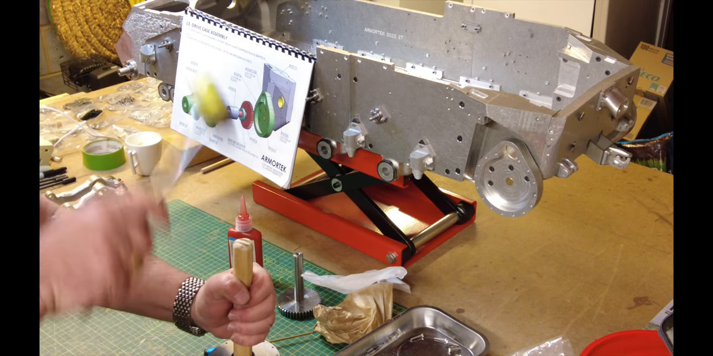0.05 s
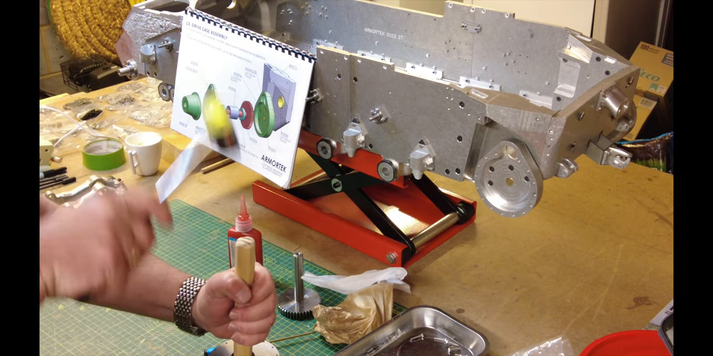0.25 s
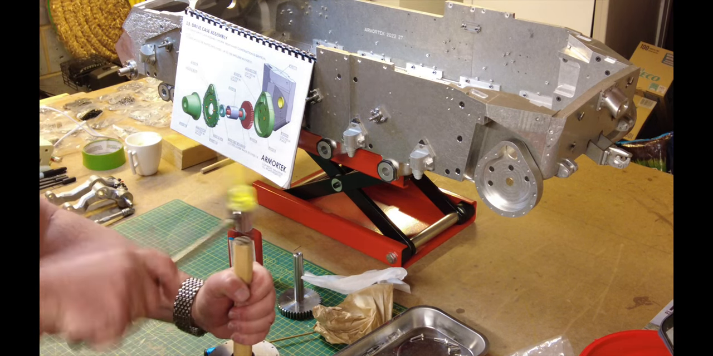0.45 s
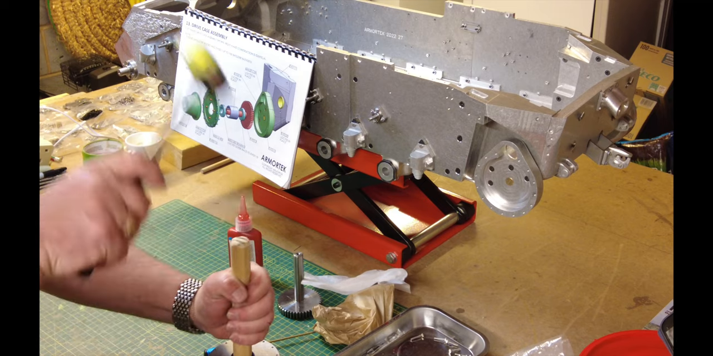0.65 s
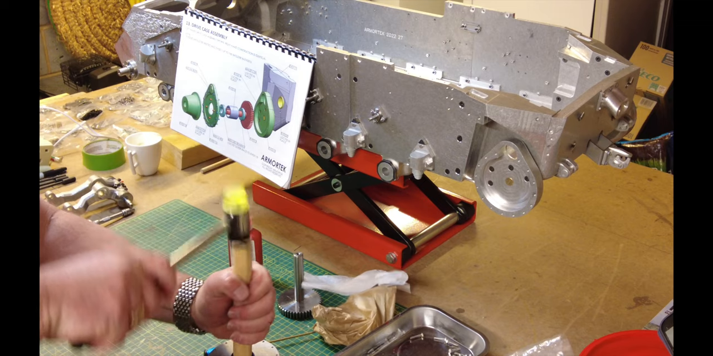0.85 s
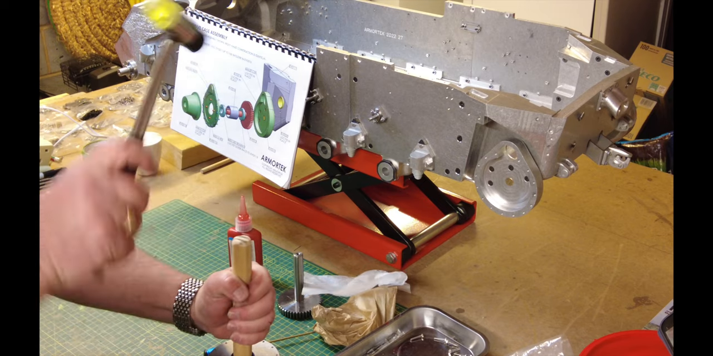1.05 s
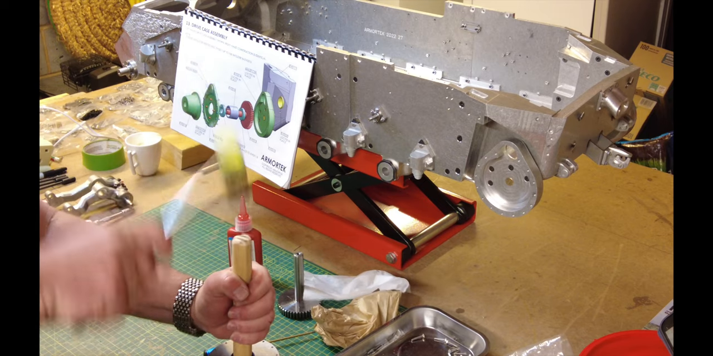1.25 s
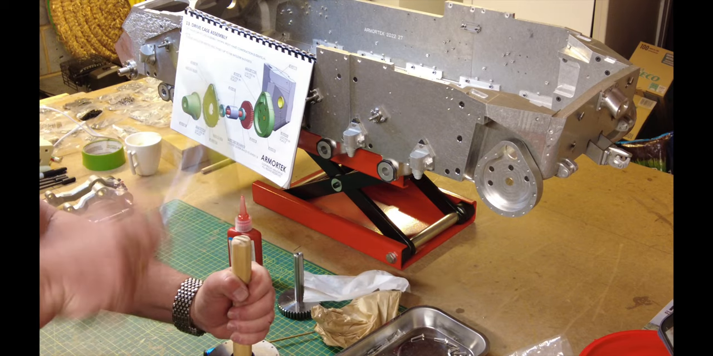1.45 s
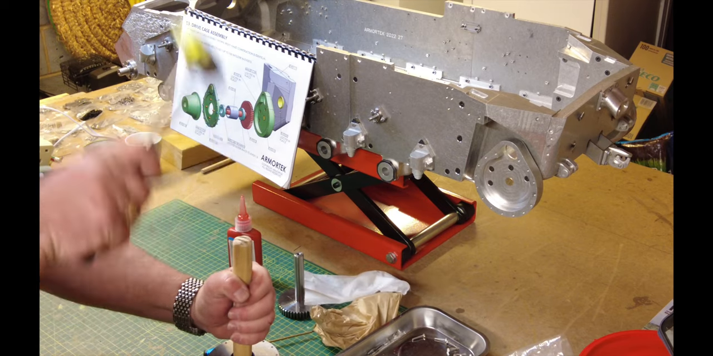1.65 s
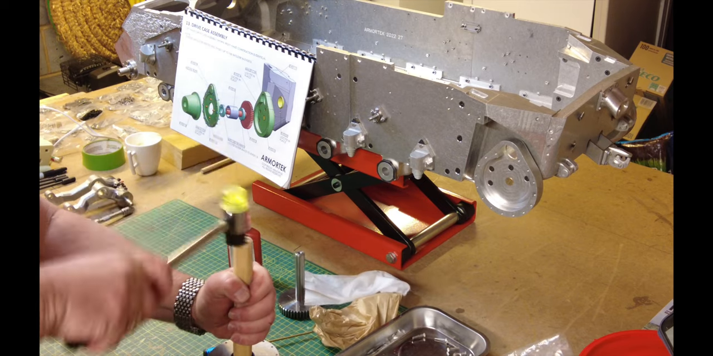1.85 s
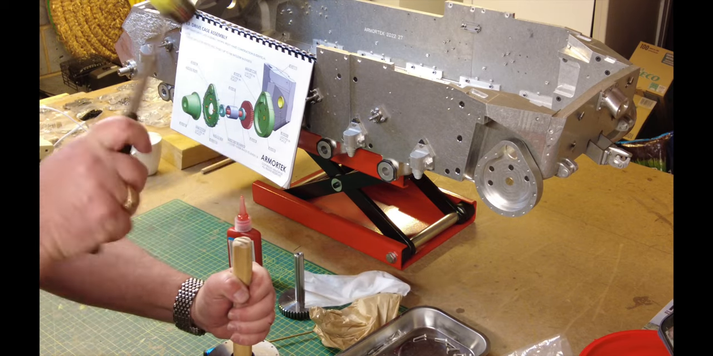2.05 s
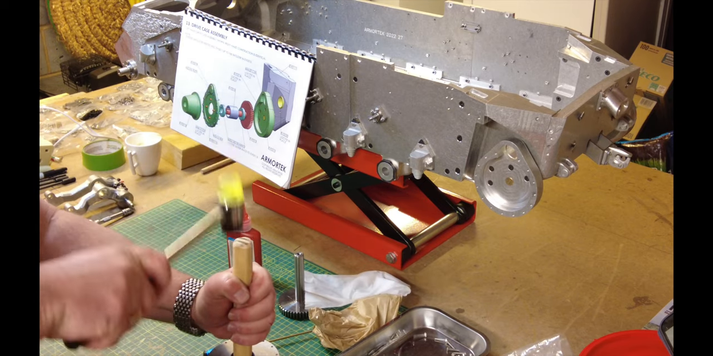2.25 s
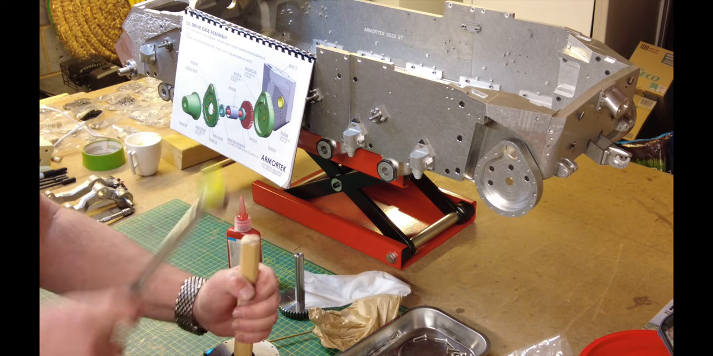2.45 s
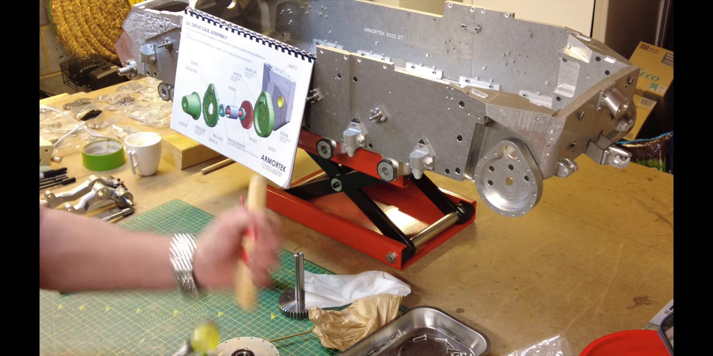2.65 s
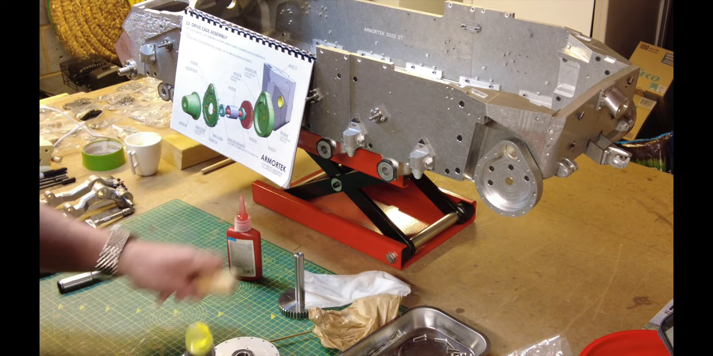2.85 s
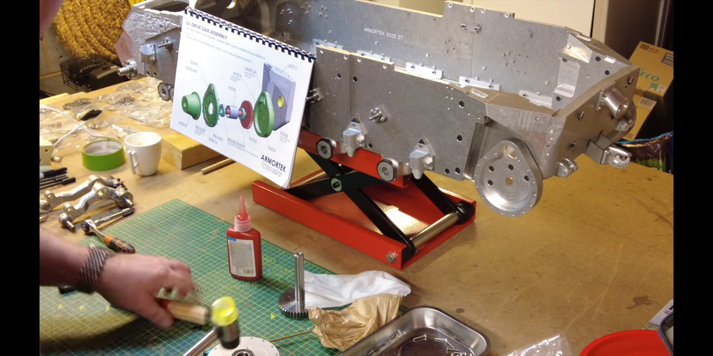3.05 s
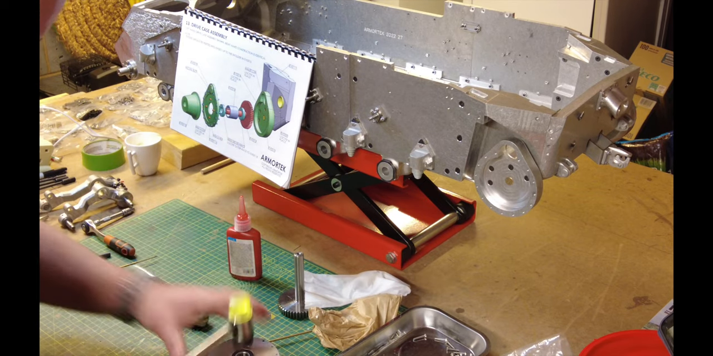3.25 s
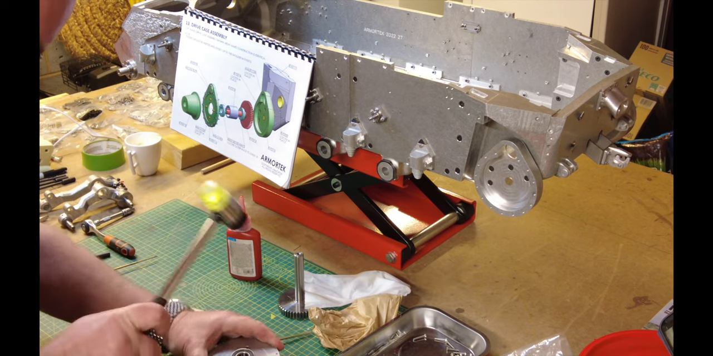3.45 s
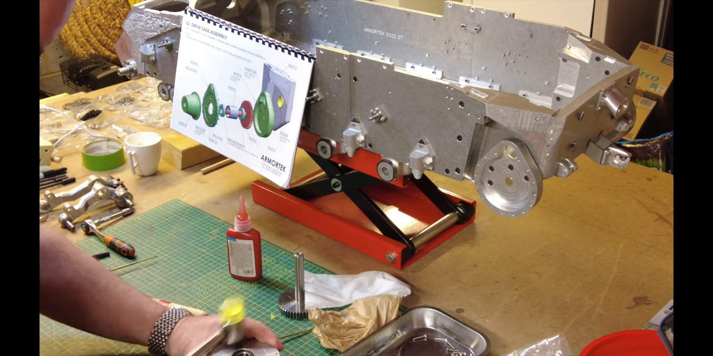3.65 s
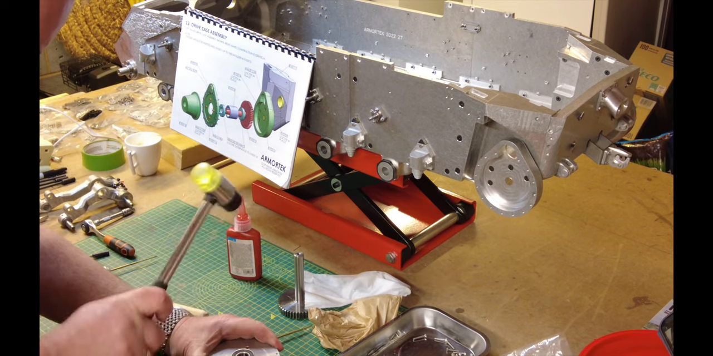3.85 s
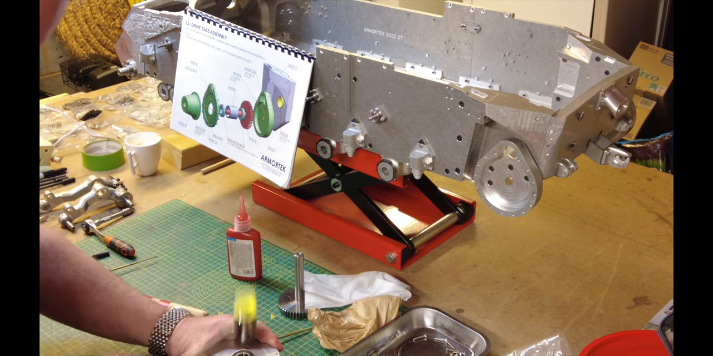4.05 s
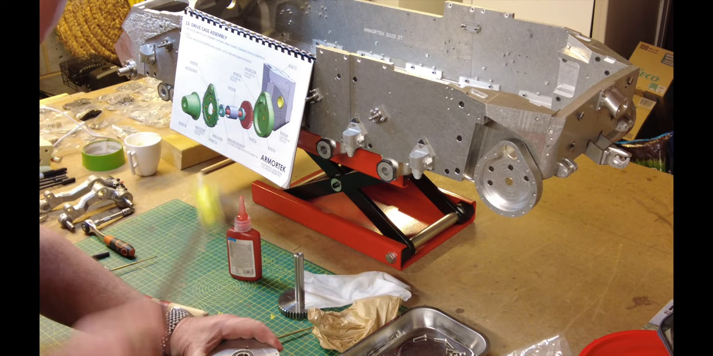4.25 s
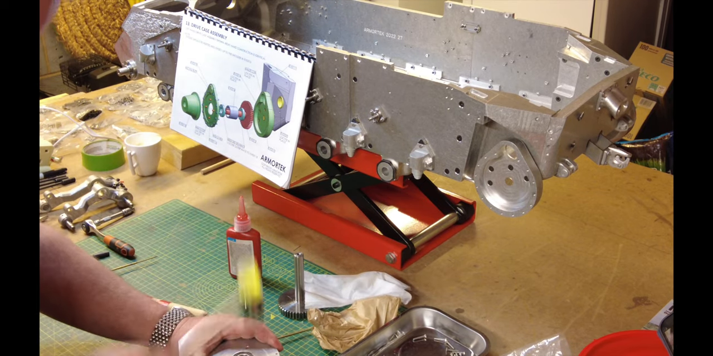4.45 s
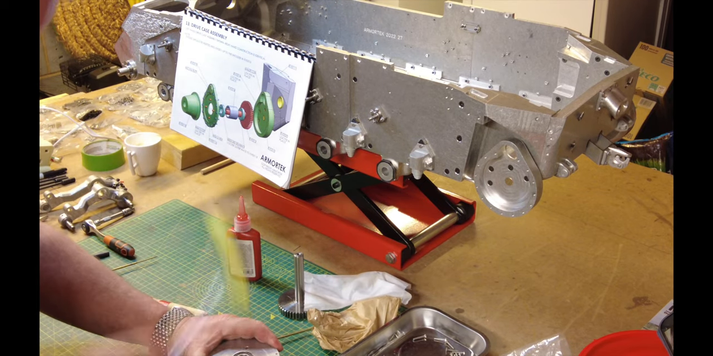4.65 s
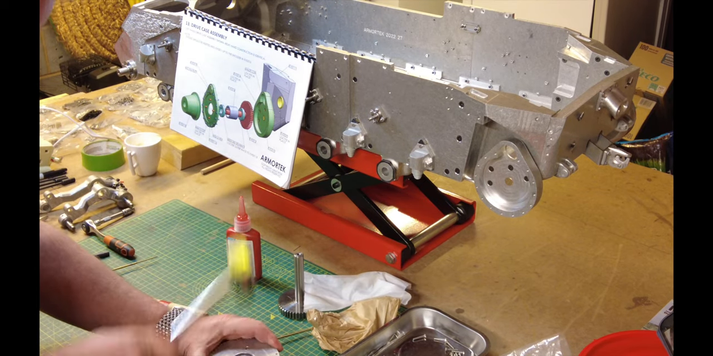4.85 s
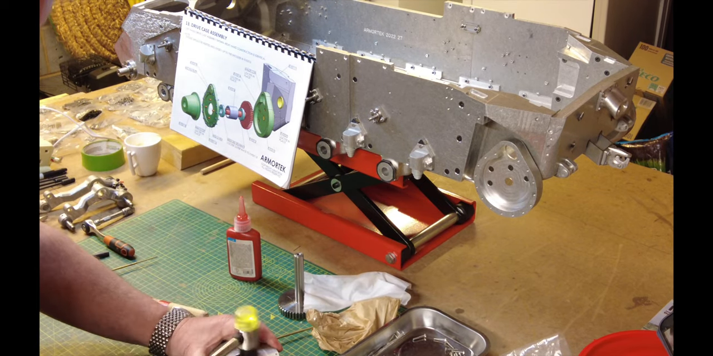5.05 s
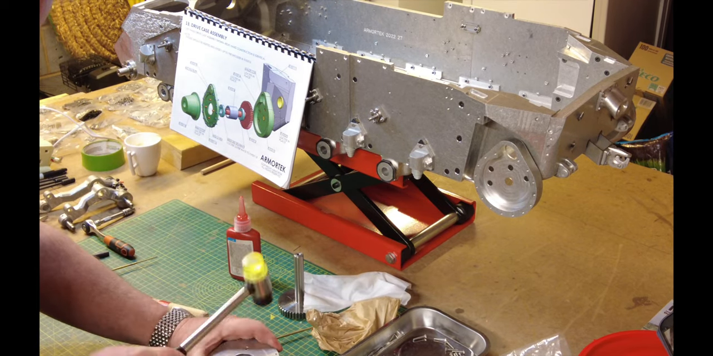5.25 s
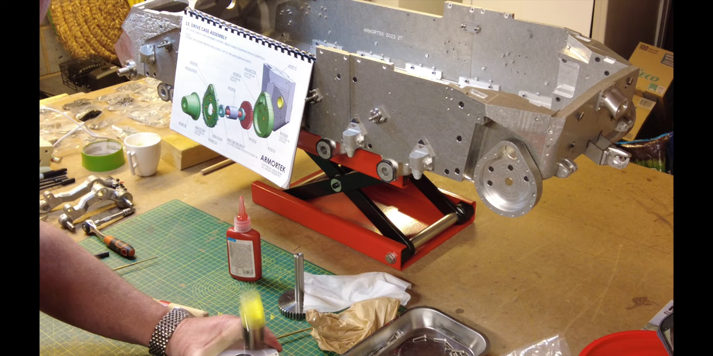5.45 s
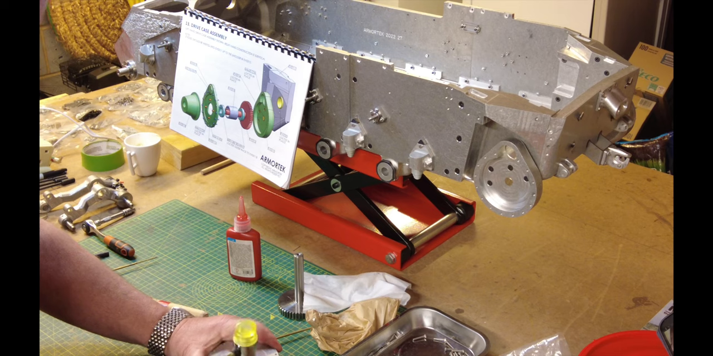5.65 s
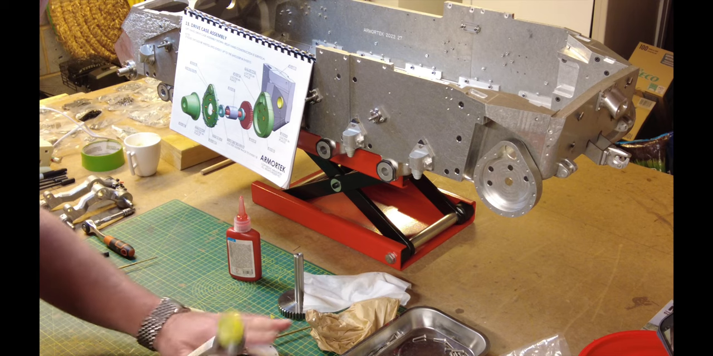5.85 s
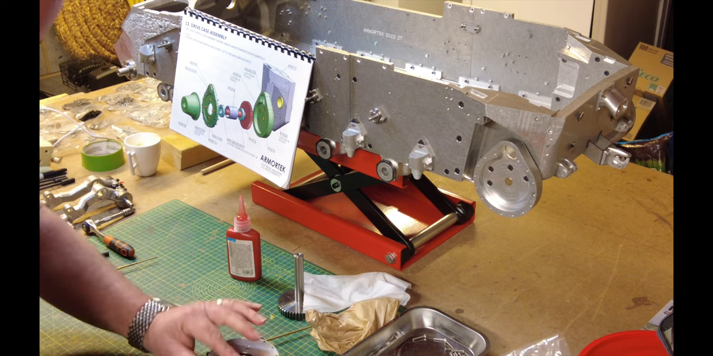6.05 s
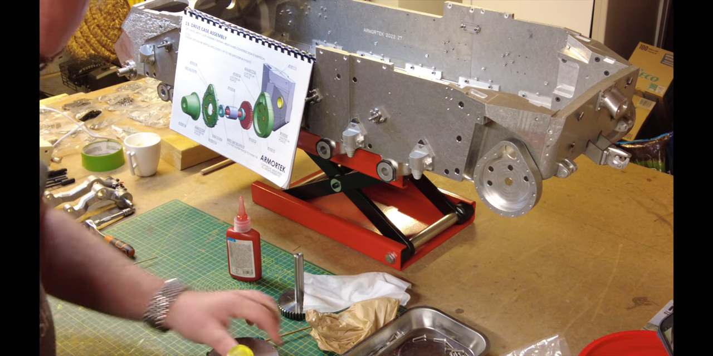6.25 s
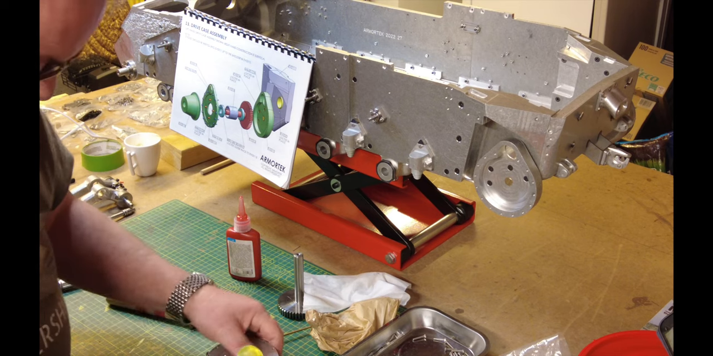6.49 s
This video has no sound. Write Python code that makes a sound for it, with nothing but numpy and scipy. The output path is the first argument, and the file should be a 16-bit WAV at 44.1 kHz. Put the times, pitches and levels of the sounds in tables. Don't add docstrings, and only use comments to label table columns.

```python
import sys
import numpy as np
from scipy import signal
from scipy.fft import rfft, irfft, next_fast_len
from scipy.io import wavfile
from scipy.ndimage import map_coordinates

SR = 44100
rng = np.random.default_rng(int(sys.argv[2]) if len(sys.argv) > 2 else 0)


def dump(signal):
    limited = np.clip(np.atleast_2d(signal).T, -1, 1)
    pcm = np.round(limited * 32767).astype(np.int16)
    wavfile.write(sys.argv[1], SR, pcm)


def magnitude_from_level(level_db):
    exponent = np.asarray(level_db, float) / 20
    return 10 ** exponent


N = 287531


def unit(x):
    return x / np.sqrt(np.mean(x ** 2) + 1e-20)


def along(points, hz):
    f, v = np.transpose(points)
    return np.interp(np.log(hz + 1), np.log(f + 1), v)


def filtered(x, response):
    m = next_fast_len(len(x) + 8192)
    return irfft(rfft(x, m) * response(np.fft.rfftfreq(m, 1 / SR)), m)[:len(x)]


def shaped(x, spectrum):
    return filtered(x, lambda hz: magnitude_from_level(along(spectrum, hz)))


def resonances(peaks):
    def response(f):
        total = 0
        for k, (centre, width, db) in enumerate(peaks):
            damping = 1j * f * width
            total = total + (-1) ** k * magnitude_from_level(db) * damping / (centre ** 2 - f ** 2 + damping)
        return total
    return response


def noise(n, spectrum):
    return unit(shaped(rng.standard_normal(n), spectrum))


def wobble(rate_hz):
    knots = rng.standard_normal(int(N * rate_hz / SR) + 4)
    return map_coordinates(knots, [np.arange(N) * rate_hz / SR])


def add(out, s, x):
    i = round(s * SR)
    out[i:i + len(x)] += x[:len(out) - i]


def held(strokes):
    t = np.arange(N) / SR
    gain = np.zeros(N)
    for start, end, db, rise, fall in strokes:
        outside = np.maximum((start - t) / rise, (t - end) / fall)
        gain += magnitude_from_level(db - 20 * np.maximum(0, outside))
    return gain


# f/Hz, t60/s
ROOM_DECAY = [(60, 0.16), (160, 0.32), (420, 0.27), (1100, 0.27), (2900, 0.33), (6000, 0.3), (9500, 0.28),
              (12500, 0.23), (16000, .1)]


def dying(x, stretch=1):
    hz, t, z = signal.stft(x, SR, nperseg=256)
    t60 = stretch * along(ROOM_DECAY, hz)[:, None]
    return signal.istft(z * magnitude_from_level(-60 * t / t60), SR, nperseg=256)[1][:len(x)]


# f/Hz, level/dB
HUM = [(12, -39), (20, -8), (60, -2.5), (88, -24.5), (127, -11.5), (182, -23), (399, -29.5), (434, -27.5),
       (472, -30), (1000, -37.5), (2530, -44.5), (3160, -50), (3630, -47), (7110, -53), (16000, -61)]
FAN_HZ, FAN_WIDTH_HZ, FAN_OVER_FLOOR_DB = 1000, 340, 1
FAN_DB, RUMBLE_DB = -66, -60.5
FAN_CLIMB_DB_PER_S, RUMBLE_CLIMB_DB_PER_S = 0.62, 1
STIR_DB, STIR_FLIGHT_POWER, STIR_T60_S = -51, 0.83, 0.99


def workshop():
    t = np.arange(N) / SR
    stir = np.zeros(N)
    for s, _, _, flight, _ in DOWEL + DIRECT + RIM:
        decay = magnitude_from_level(STIR_DB - 60 * np.abs(t - s) / STIR_T60_S) * (t > s)
        stir += decay * (flight * 20) ** STIR_FLIGHT_POWER
    steady = noise(N, HUM)
    below = lambda hz: 1 / (1 + (hz / 250) ** 4)
    low = unit(filtered(steady, below))
    high = unit(filtered(steady, lambda hz: (1 - below(hz)) / (1 + (hz / 13000) ** 12)))
    blades = resonances([(FAN_HZ, FAN_WIDTH_HZ, 0)])
    whirr = unit(filtered(rng.standard_normal(N), lambda hz: blades(hz) ** 2))
    high = high + magnitude_from_level(FAN_OVER_FLOOR_DB) * whirr
    fan = magnitude_from_level(FAN_DB + FAN_CLIMB_DB_PER_S * t) + stir
    rumble = magnitude_from_level(RUMBLE_DB + RUMBLE_CLIMB_DB_PER_S * t) + stir
    return fan * magnitude_from_level(-7 + wobble(17.0)) * high + rumble * magnitude_from_level(1.1 * wobble(36)) * low


DOWEL_JOLT_DB, DIRECT_JOLT_DB, RIM_JOLT_DB = -43.5, -29, -43
JOLT_FLIGHT_POWER = 5.3


def air_push():
    out, t = .0008 * wobble(7.6) - .0012, np.arange(SR) / SR
    jolt = 3 * (1.4 * np.exp(-t / .085) - 3 * np.exp(-t / .03) + 1.6 * np.exp(-t / .006))
    for blows, jolt_db in ((DOWEL, DOWEL_JOLT_DB), (DIRECT, DIRECT_JOLT_DB), (RIM, RIM_JOLT_DB)):
        for s, _, _, flight, _ in blows:
            add(out, s, magnitude_from_level(jolt_db) * (flight * 20) ** JOLT_FLIGHT_POWER * jolt)
    return out


# t/s, peak/dB, f/Hz
CLINKS = [(2.665, -66, 9300), (2.704, -61, 6650), (2.725, -58, 7300), (2.804, -66, 2120),
          (2.850, -66, 7000), (2.874, -63, 7240), (3.231, -58, 2500), (4.176, -48, 8300),
          (4.257, -53, 8140), (5.92, -62, 2400), (6.385, -60, 2150)]
CLINK_T60_S, CLINK_WIDTH_OVER_PITCH, CLINK_EDGE_DB = .03, .12, -4
# start/s, end/s, level/dB, rise/s, fall/s
RUSTLE = [(6.3, 6.42, -71.5, 0.2, .2)]
# f/Hz, width/Hz, level/dB
RUSTLE_PEAKS = [(2380, 560, -2), (4230, 1300, -5), (5520, 1300, -10)]


def clinks():
    out, t = np.zeros(N), np.arange(SR // 16) / SR
    for s, db, hz in CLINKS:
        ring = resonances([(hz, CLINK_WIDTH_OVER_PITCH * hz, 0)])
        body = lambda f: ring(f) ** 2 + magnitude_from_level(CLINK_EDGE_DB) * magnitude_from_level(along(RATTLE, f))
        blip = unit(filtered(rng.standard_normal(len(t)), body))
        add(out, s, magnitude_from_level(db - 60 * t / CLINK_T60_S) * (1 - np.exp(-t / .001)) * blip)
    rustle = unit(filtered(rng.standard_normal(N), resonances(RUSTLE_PEAKS)))
    return out + held(RUSTLE) * rustle * magnitude_from_level(1.8 * wobble(60))


# t/s, peak/dB, f/Hz, thud/dB
TICKS = [
    (0.38, -50, 1090, -64),
    (2.962, -42, 3200, -48),
    (2.971, -33, 900, -36.5),
    (2.98, -55, 3900, -72),
    (3.08, -49, 900, -44),
    (3.114, -38, 2550, -44.5),
    (3.416, -52, 1400, -56),
    (3.482, -41, 7100, -45),
    (3.509, -48, 1800, -52),
]
# f/Hz, level/dB per Hz
THUD = [(24, -31), (40, -11.5), (193, -1), (527, -5), (668, -9.5), (809, -5.5), (1300, -15), (3230, -29),
        (12000, -56.5), (15600, -83.5), (22000, -120)]
# t/s, peak/dB, f/Hz
PALMS = [
    (2.453, -44, 200),
    (3.08, -35, 129),
    (3.431, -52, 149),
    (5.953, -33.5, 126),
    (6.141, -40.5, 115.6),
    (6.192, -52, 91),
    (6.339, -37, 134.5),
]
# start/s, end/s, level/dB, rise/s, fall/s
DRAG = [
    (2.3, 2.622, -56, .05, 0.014),
    (3, 3.33, -71, .08, .05),
    (3.49, 3.52, -67.5, 0.006, .09),
    (2, 3.47, -75, 0.087, .03),
]
# f/Hz, level/dB
SCRAPE = [(100, -8.5), (220, 4), (400, -3), (700, -0.5), (1200, -2), (2400, 0.5), (4300, -8), (6500, -14),
          (10000, -23.5), (15000, -57)]
# start/s, end/s, level/dB, rise/s, fall/s
JINGLE = [
    (2.71, 2.74, -75, .02, .1),
    (2.74, 3.18, -80, .02, .05),
]
# f/Hz, width/Hz, level/dB
JINGLE_MODES = [(3230, 110, 0), (7100, 400, -22)]
TICK_T60_S = 0.0098


def handling():
    out, t = np.zeros(N), np.arange(SR // 4) / SR
    soft_start = 1 - np.exp(-(t / 0.00006) ** 2)
    for s, db, hz, thud_db in TICKS:
        top_hz = 1.1 * hz + 1450
        click = noise(len(t), [(300, -20), (top_hz / 4 + 300, 0), (top_hz + 300, -3), (0.64 * top_hz + 400, -40)])
        u = t * top_hz / .45
        snap = 3 * (1 - u / 2) * np.exp(-(u - 2) ** 2 / 2) * u
        ring = magnitude_from_level(-60 * t / TICK_T60_S) * np.sin(2 * np.pi * hz * t)
        tick = snap + .5 * magnitude_from_level(-60 * t / 0.02) * click + 0.17 * ring
        thud = dying(noise(len(t), THUD), stretch=0.68)
        add(out, s, soft_start * (magnitude_from_level(db - 1.5) * tick + magnitude_from_level(thud_db) * thud))
    for s, db, hz in PALMS:
        skin = noise(len(t), [(60, -22), (220, 10), (600, -7), (2000, -58)])
        pat = np.sin(2 * np.pi * hz * t) + 0.3 * skin
        add(out, s, magnitude_from_level(db + 10.0 - 60 * t / 0.077) * pat * (1 - np.exp(-t / 0.021)))
    jingle = unit(filtered(rng.standard_normal(N), resonances(JINGLE_MODES))) * magnitude_from_level(2 * wobble(45))
    scrape = magnitude_from_level(2 * wobble(90)) * noise(N, SCRAPE)
    return out + held(DRAG) * scrape + held(JINGLE) * jingle


# f/Hz, width/Hz, level/dB
TOOLS = [(2547, 180, 3), (2974, 20, 6), (4034, 120, 0), (5570, 270, -7.5), (7070, 470, -11),
         (8300, 210, -9.5), (9750, 68, -7)]
# f/Hz, level/dB per Hz
RATTLE = [(1000, -21), (2000, -0.5), (4000, -10), (6000, -14.5), (7500, -14), (10000, -15.5),
          (12000, -24.5), (16000, -30)]
# share of flight/1, peak/dB
LIGHT_TOOLS = [
    (0.332, -36.5),
    (.57, -31),
    (.8, -27.5),
]
# t/s, peak/dB
STRAYS = [
    (0.0812, -76),
    (0.3434, -64),
    (3.8576, -63),
    (4.2883, -62),
    (4.9184, -50.5),
    (4.9926, -64),
]
LAND_T60_S, LIGHT_T60_S, LAND_SCATTER, LIGHT_SCATTER_DB = .06, .05, .05, 3


def woken_tools(detune, spread_db):
    return [(hz * (1 + rng.normal(0, detune)), width, db + rng.normal(0, spread_db))
            for hz, width, db in TOOLS]


def landings():
    out, t = np.zeros(N), np.arange(SR // 8) / SR
    falls = [(s, db, LIGHT_T60_S) for s, db in STRAYS]
    for s, _, _, flight, land_db in DOWEL + DIRECT + RIM:
        for share, db in LIGHT_TOOLS:
            land_s = s + flight * (share + rng.normal(0, LAND_SCATTER))
            falls.append((land_s, db + rng.normal(0, LIGHT_SCATTER_DB), LIGHT_T60_S))
        falls.append((s + flight, land_db, LAND_T60_S))
    for s, db, t60 in falls:
        jolt = rng.standard_normal(len(t)) * magnitude_from_level(-60 * t / t60) * (1 - np.exp(-t / 0.00033))
        ring = unit(filtered(jolt, resonances(woken_tools(0.033, 5))))
        clink = 2.2 * ring + unit(shaped(jolt, RATTLE))
        add(out, s, magnitude_from_level(db + 3.5) * clink / np.abs(clink).max())
    return out


RATTLE_DB_PER_BOOM_DB, RATTLE_LAG_S = .6, .005


def tool_rattle(t, flight):
    clumps = magnitude_from_level(1.0 * map_coordinates(rng.standard_normal(60), [t * 110]))
    shower = clumps * (rng.random(len(t)) < .15) * rng.standard_normal(len(t))
    ring = unit(filtered(shower, resonances(woken_tools(0.022, 1.7))))
    u = t / (flight + RATTLE_LAG_S)
    return (0.74 * ring + unit(shaped(shower, RATTLE))) * (u * np.exp(1 - u)) ** 3.47


# f/Hz, level/dB, t60/s
BENCH = [(57, -10, .3), (95, -6, .15), (143, 4, .16), (231, -12, .2), (345, 0, .25), (427, -4, .15),
         (528, -6, .2), (591, -7, .2), (721, -7, .18), (808, -4, .24), (945, -4, .33), (1051, -4, .2),
         (1152, -8, .2), (1360, -11, .17), (1460, -13, .22)]


def bench_boom(t, echoes, colour, bright_db):
    ring = np.zeros(len(t))
    for hz, db, t60 in BENCH:
        ring += magnitude_from_level(db + rng.normal(0, 2) - 60 * t / t60) * np.sin(2 * np.pi * hz * t)
    same = lambda hz: 0.75 / (1 + (hz / 1500) ** 2) / (1 + (250 / (hz + 1)) ** 4)
    edge = lambda hz: magnitude_from_level(bright_db / (1 + (3000 / (hz + 1)) ** 2))
    differing = lambda hz: edge(hz) * np.sqrt(np.abs(1 - same(hz) ** 2))
    fresh = filtered(dying(noise(len(t), colour)), differing)
    treble = filtered(fresh, lambda hz: 1 / (1 + (3500 / (hz + 1)) ** 4))
    fresh = fresh - 0.16 * treble * np.exp(-t / 0.042)
    onset = 1 - np.exp(-np.maximum(t - .0045, 0) / 0.0005)
    return (filtered(echoes, same) + fresh + magnitude_from_level(-11) * ring) * onset


PUSH_OVER_KNOCK, PUSH_HALF_WIDTH_S = .35, .00024


def mallet(blows, knock_peaks, colour, pattern, rattle_db, bright_db):
    out, t = np.zeros(N), np.arange(len(pattern)) / SR
    echoes = dying(unit(shaped(pattern, colour)))
    contact = np.exp(-((t - .004) / .00016) ** 2)
    knock = filtered(contact, resonances(knock_peaks))
    push = np.exp(-((t - .0041) / PUSH_HALF_WIDTH_S) ** 2)
    knock = knock / np.abs(knock).max() + PUSH_OVER_KNOCK * push
    for s, db, boom_db, flight, _ in blows:
        chatter = magnitude_from_level(-23.0 - 60 * np.abs(t - .0036) / 0.0077) * noise(len(t), RATTLE) * (t > .0028)
        lead = magnitude_from_level(-39 - 60 * np.abs(t - .0034) / 0.016) * noise(len(t), THUD) * (t < .004)
        hit = magnitude_from_level(db + 20.5) * (knock + chatter + lead)
        boom = magnitude_from_level(boom_db) * bench_boom(t, echoes, colour, bright_db)
        rattle = magnitude_from_level(rattle_db + RATTLE_DB_PER_BOOM_DB * boom_db) * tool_rattle(t, flight)
        add(out, s - .0024, hit + boom + rattle)
    return out


# t/s, knock peak/dB, boom/dB, heaviest tool's flight/s, its landing/dB
DOWEL = [
    (0.1227, -9.5, -6, 0.033, -17.5),
    (0.47, -5.5, -1, 0.051, -19.5),
    (0.817, -3, 1, 0.054, -20.5),
    (1.154, 0, 2.5, 0.057, -22.5),
    (1.494, 1, 2.5, 0.065, -22),
    (1.837, 0.5, 2.5, 0.069, -18),
    (2.18, 4.5, 2.5, 0.071, -17),
]
DIRECT = [
    (3.598, 0.92, 0.5, .05, -14.5),
    (5.047, 0.62, 0.5, 0.057, -18),
    (5.351, -0.43, -1, 0.043, -19),
    (5.592, -2.9, -2, .037, -17.5),
]
RIM = [
    (3.969, -2.5, -2.5, 0.045, -16),
    (4.326, -0.5, -2.5, 0.052, -15),
    (4.697, -3, -3.5, 0.053, -11.5),
]
# f/Hz, width/Hz, level/dB
DOWEL_KNOCK = [(830, 130, 0), (140, 50, -3), (1070, 130, -1), (1900, 200, -14), (420, 120, -4),
               (2780, 260, -2), (9700, 500, -34), (7300, 500, -24), (5200, 400, -14)]
DIRECT_KNOCK = [(834, 110, 0), (140, 50, -4), (1055, 110, 0), (1940, 230, -12), (416, 120, -7),
                (2870, 260, -3), (9000, 600, -40), (6720, 400, -33), (5130, 400, -22)]
RIM_KNOCK = [(818, 1100, -9.5), (140, 20, 4.5), (1258, 810, 0.5), (2970, 400, -11), (370, 140, 1.5),
             (9000, 1100, -38.5), (2230, 350, -4), (6920, 1100, -41.5), (5000, 200, -12)]
# f/Hz, level/dB per Hz
DOWEL_BOOM = [(18, -42.5), (30, -2), (66, -2.5), (345, -1.5), (499, 2.5), (760, 1), (1070, -2),
              (1190, -3.5), (1960, -14.5), (2410, -21), (5040, -27.5), (9460, -40.5), (16000, -61)]
DIRECT_BOOM = [(18, -19), (30, -5), (64, -2), (134, -3.5), (473, -0.5), (801, 1.5), (866, 1.5), (937, -0.5),
               (2170, -15), (2540, -18.5), (4910, -26.5), (7090, -28.5), (16000, -51.5)]
RIM_BOOM = [(18, -32.5), (30, 0), (355, -0.5), (540, 0), (684, -8), (801, 1), (866, -4), (962, -5),
            (1590, -10.5), (2480, -20), (4780, -27.5), (7090, -29.5), (16000, -48)]


def scene():
    echoes = rng.standard_normal(SR // 2)
    blows = (mallet(DOWEL, DOWEL_KNOCK, DOWEL_BOOM, echoes, rattle_db=-33, bright_db=0.6)
             + mallet(DIRECT, DIRECT_KNOCK, DIRECT_BOOM, echoes, rattle_db=-32.5, bright_db=-5.5)
             + mallet(RIM, RIM_KNOCK, RIM_BOOM, echoes, rattle_db=-28.0, bright_db=0.0))
    return (workshop() + clinks() + handling() + landings() + blows)[None]


def roll_off(x):
    return signal.sosfilt(signal.butter(12, 16780, fs=SR, output="sos"), x)


DUCK_DB, LOOK_AHEAD_S, DUCK_FALL_S, RECOVER_S = -17.5, 0.018, 0.0024, 0.03


def record(dry):
    t = np.arange(N) / SR
    gain_db = np.zeros(N)
    for s, _, boom_db, _, _ in DOWEL + DIRECT + RIM:
        lag = t - s
        fall = 1 - np.exp(-np.maximum(lag + LOOK_AHEAD_S, 0) / DUCK_FALL_S)
        recovery = np.exp(-np.maximum(lag, 0) / RECOVER_S)
        gain_db += (1 + 0.065 * (boom_db + 4)) * DUCK_DB * fall * recovery
    x = dry[0] * magnitude_from_level(gain_db) + air_push()
    x = x / (1 + np.abs(x / .76) ** 5) ** (1 / 5)
    x = filtered(x, lambda hz: 1 / (1 + (hz / 15800) ** 120))
    return roll_off(x[None])


dry = scene()
out = record(dry)
dump(out)
```